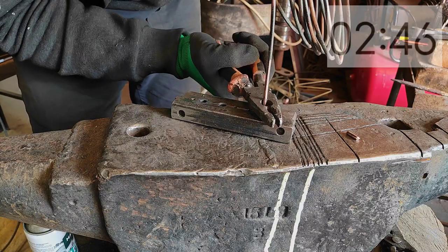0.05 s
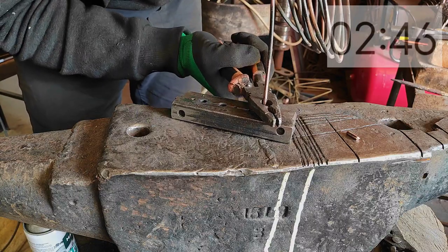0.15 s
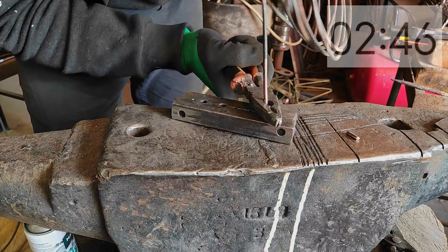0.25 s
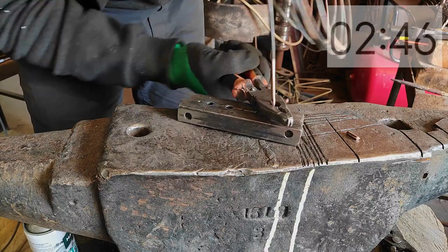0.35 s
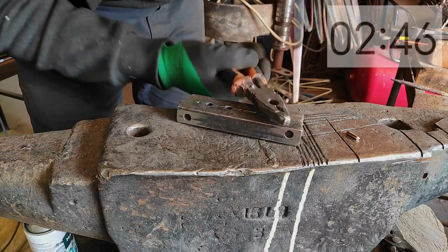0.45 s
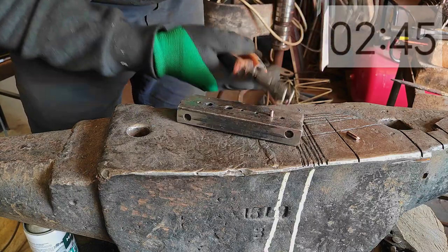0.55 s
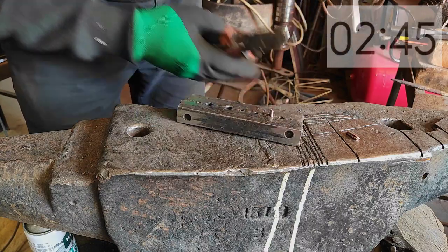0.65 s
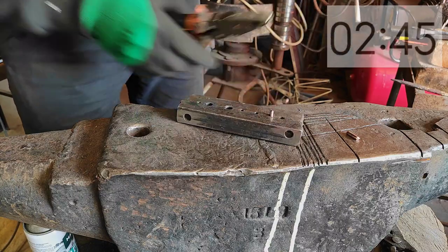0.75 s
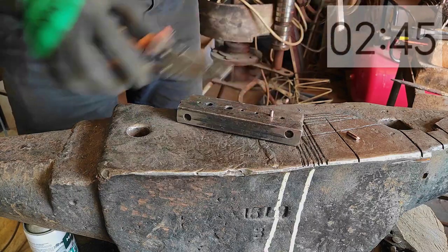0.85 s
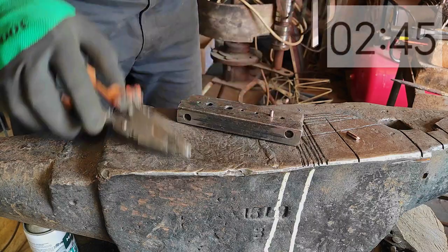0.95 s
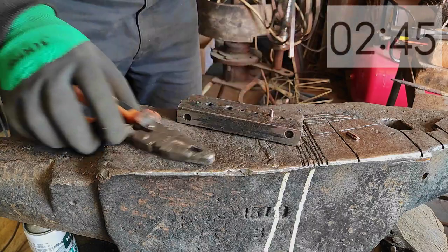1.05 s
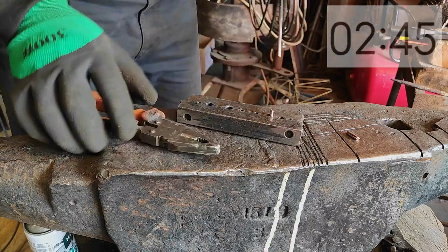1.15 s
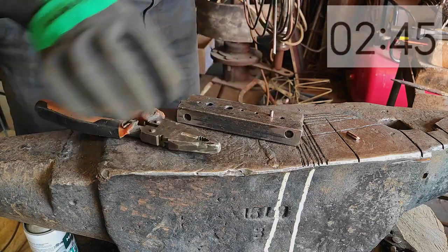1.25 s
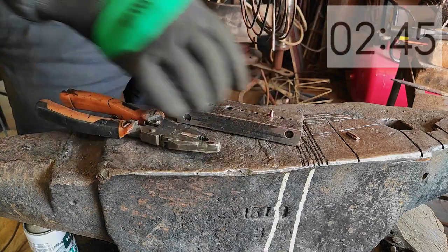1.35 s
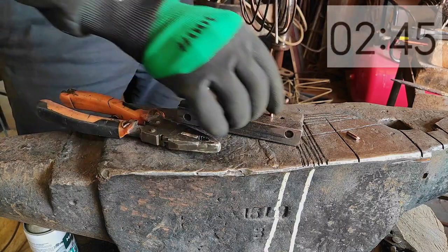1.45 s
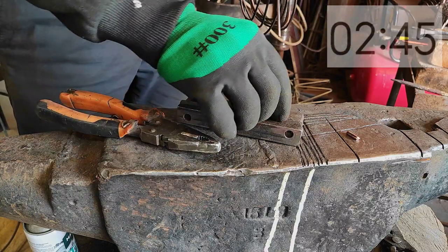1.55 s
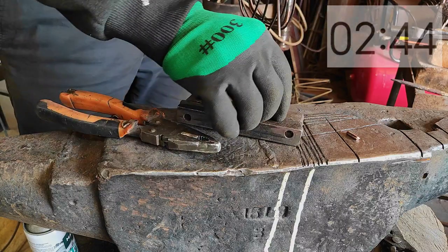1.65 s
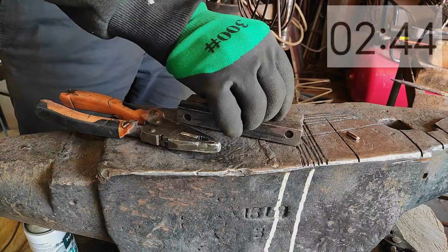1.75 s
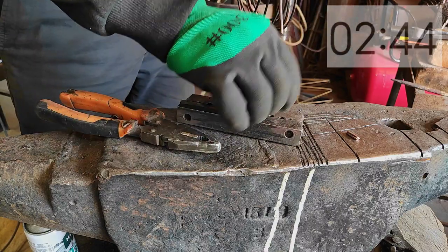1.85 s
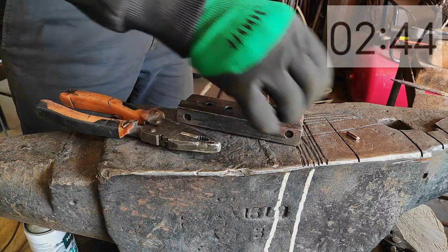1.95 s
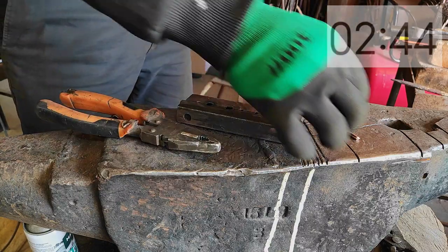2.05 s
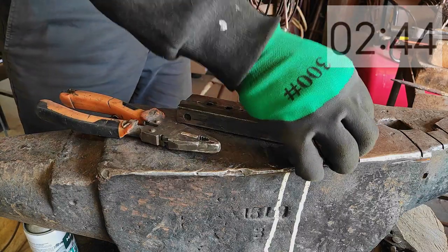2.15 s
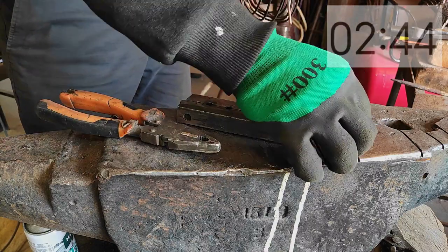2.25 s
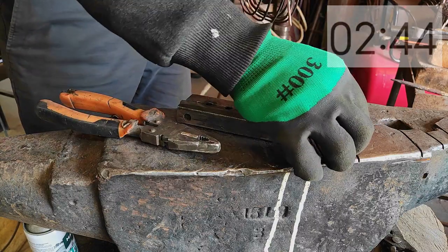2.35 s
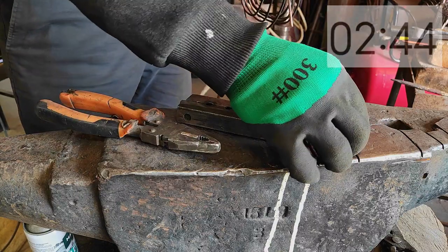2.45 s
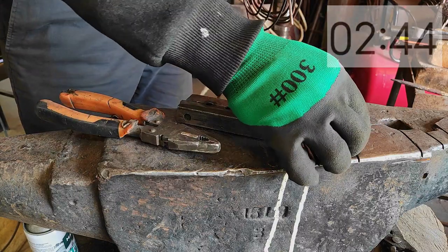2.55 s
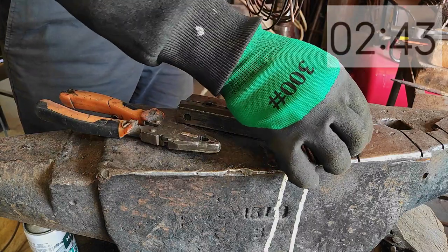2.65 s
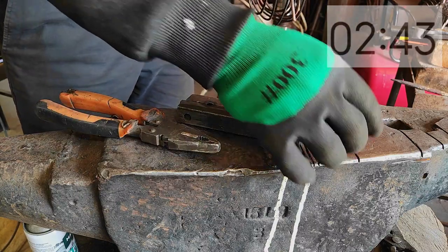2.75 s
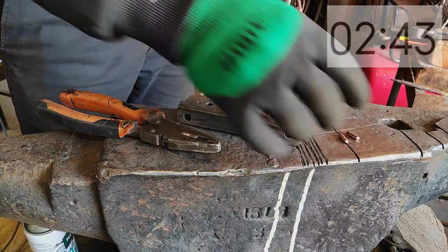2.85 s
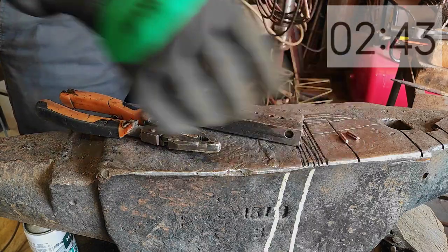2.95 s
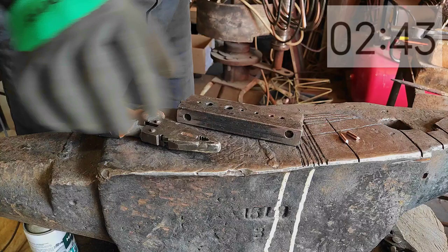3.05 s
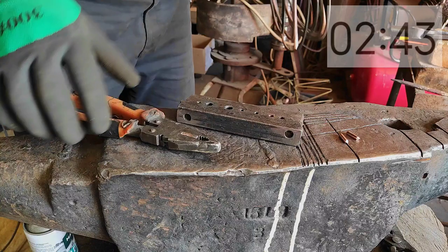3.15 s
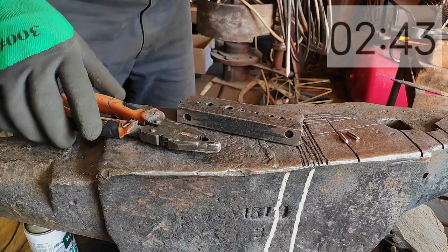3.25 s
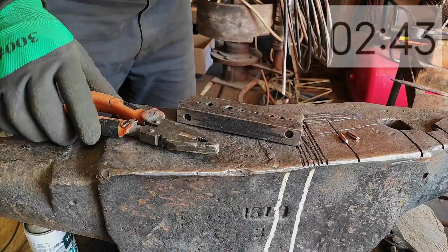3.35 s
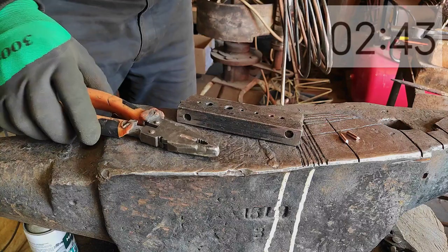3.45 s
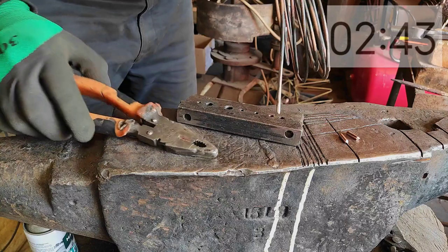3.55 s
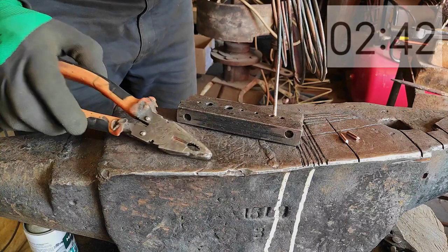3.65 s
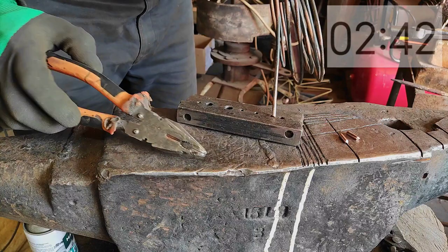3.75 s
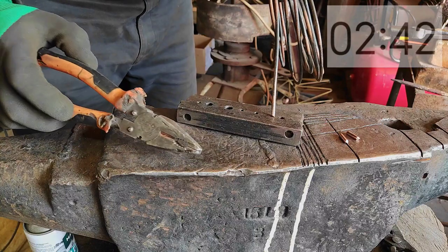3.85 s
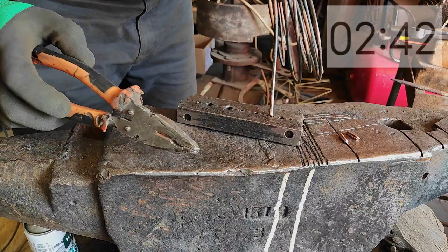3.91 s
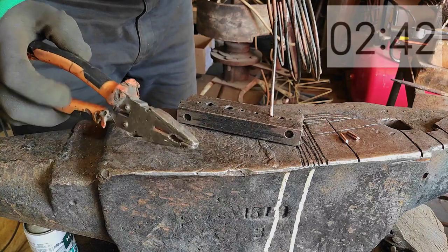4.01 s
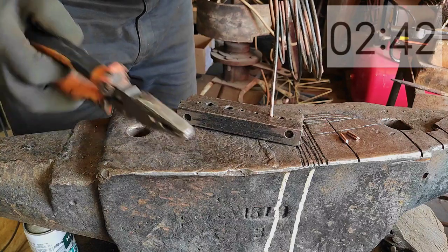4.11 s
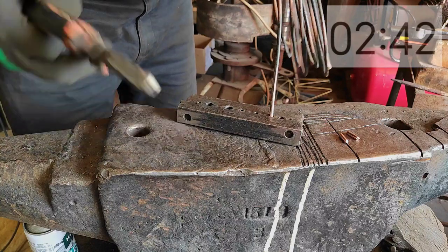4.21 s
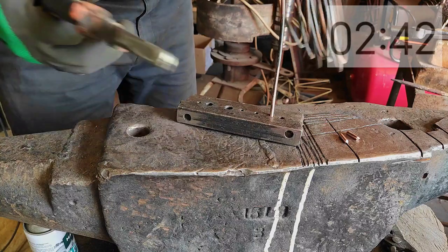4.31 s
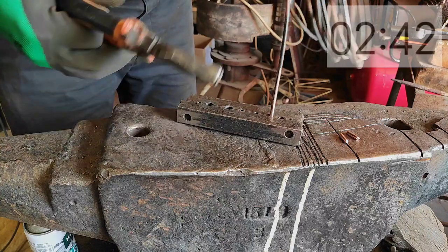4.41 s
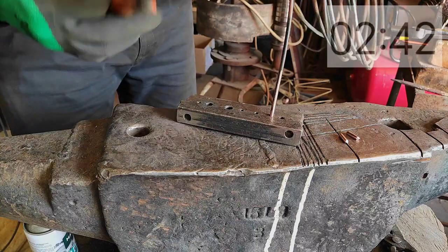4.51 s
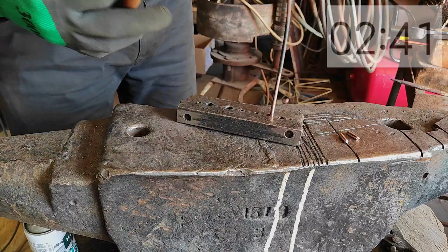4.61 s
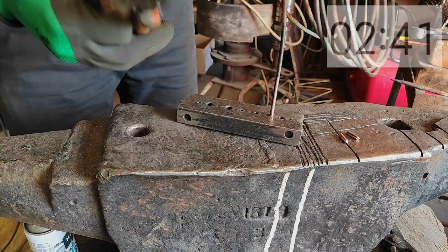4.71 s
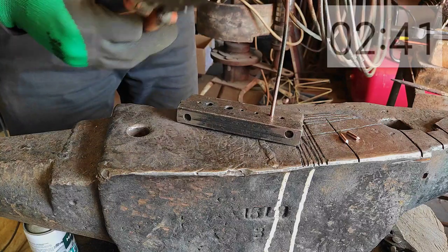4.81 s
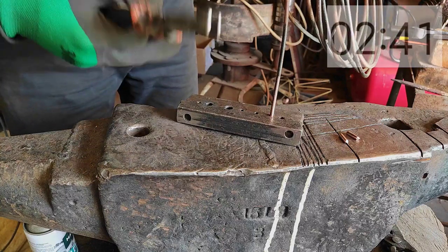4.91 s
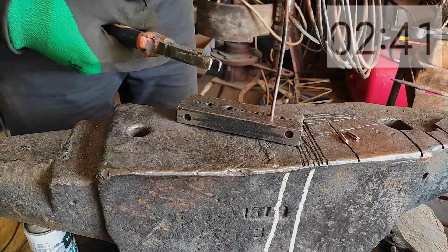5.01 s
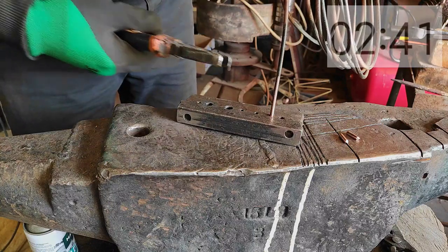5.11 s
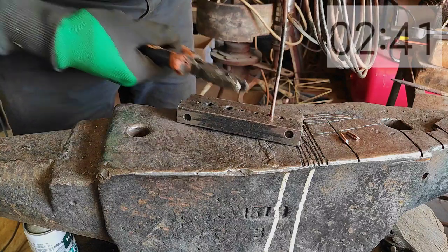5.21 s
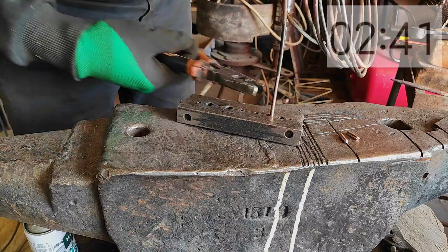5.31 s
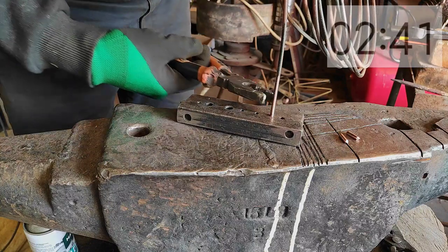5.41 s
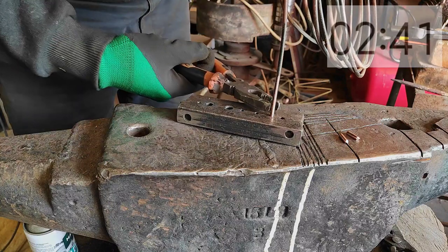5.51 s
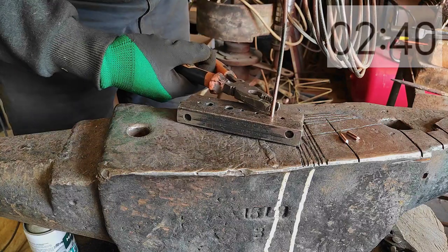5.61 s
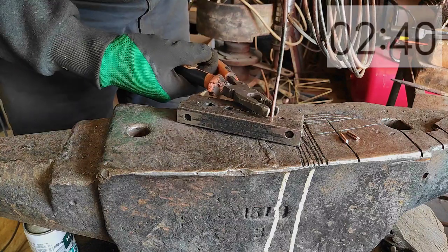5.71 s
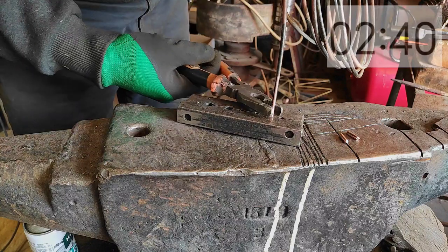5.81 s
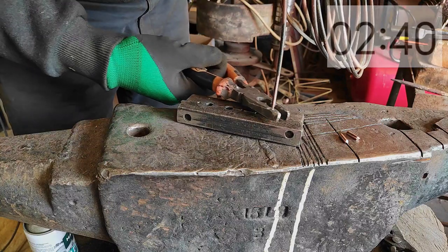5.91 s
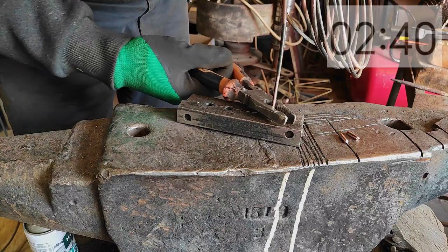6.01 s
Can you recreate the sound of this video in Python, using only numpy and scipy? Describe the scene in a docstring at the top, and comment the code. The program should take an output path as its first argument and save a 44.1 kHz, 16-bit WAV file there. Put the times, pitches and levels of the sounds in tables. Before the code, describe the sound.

Pliers snip a copper rod with a sharp crunchy snap, then clink ringing onto a steel anvil, are picked up and knocked against the rod again.

```python
"""Pliers at the anvil

Two microphones hear pliers snip a copper rod over a steel anvil, then be laid down with a clink,
picked up and set on the rod again. Each contact is a short coloured noise burst plus ringing modes;
a glove brushes the steel between them as swelling coloured noise. A small workshop answers every
blow by convolution with decaying noise, over soft room air and a low wavering hum of narrow-band noise."""
import sys
import numpy as np
from scipy import signal
from scipy.fft import rfft, irfft, next_fast_len
from scipy.io import wavfile
from scipy.ndimage import uniform_filter1d

SR = 44100
rng = np.random.default_rng(int(sys.argv[2]) if len(sys.argv) > 2 else 0)


def bounce(signal):
    """Save signal as a 16-bit WAV file at the path given by the first command-line argument."""
    frames = np.transpose(np.atleast_2d(signal))
    limited = np.clip(frames, -1, 1)
    pcm = np.round(limited * 32767).astype(np.int16)
    wavfile.write(sys.argv[1], SR, pcm)


N = 267610

# spectrum of the room's soft noise: pitch_hz, level_db
AIR_COLOUR = [(12, -32), (20, 0.5), (64, -14.5), (103, -10), (126, -12), (140, -29), (180, -18),
              (238, -28.5), (333, -25), (393, -29.5), (686, -31.5), (1100, -36), (2470, -38.5), (7520, -54),
              (15500, -49.5)]
# stereo width of that noise: pitch_hz, side_minus_mid_db
AIR_WIDTH = [(25, 1), (80, -14.5), (200, -7), (600, 0), (2000, 1), (12000, 0.5)]
# spectrum of the low hum: pitch_hz, level_db
HUM_COLOUR = [(50, -43), (75, -6), (90, 4.5), (102, -2.5), (114, 4.5), (130, -1), (160, -15), (260, -54.5)]
# the workshop's echo, band by band: pitch_hz, level_db, t60_s
ROOM_BANDS = [(120, -3.5, 1), (330, -3, 0.91), (717, -2.5, 0.56), (1544.5, -3.5, 0.58), (3535, -1.5, 0.4),
              (6500, -4.5, 0.37), (11200, -4.5, 0.28), (16000, -2, .3)]
# strokes of glove and sleeve: middle_s, length_s, level_db
BRUSHES = [(0.903, 0.65, -61), (1.857, 0.24, -65), (2.155, 0.075, -57), (3.565, 0.13, -61.5),
           (4.376, 0.17, -56), (4.729, 0.16, -56), (4.98, 0.14, -63)]
# spectrum of rubber and cloth on steel: pitch_hz, level_db
BRUSH_COLOUR = [(150, 1.5), (500, 2.5), (1200, -1), (3500, 5), (6300, 4.5), (8500, -5.5), (11000, -1.5),
                (15500, -2.5)]
# blows that reach the anvil's stand, mostly from the padded handles: start_s, level_db, ring_db
THUMPS = [(0.312, -48.5, -48), (0.405, -50.5, -70), (1.106, -46.5, -66), (1.139, -46, -54),
          (1.200, -47.5, -39), (1.232, -54.5, -73), (3.611, -57, -76), (5.621, -51, -77)]
# spectrum of a thud in the stand: pitch_hz, level_db
THUMP_COLOUR = [(60, -24), (110, -11.5), (160, 2), (230, -6.5), (320, -0.5), (500, -23.5), (1200, -31),
                (2500, -26.5), (8000, -47.5)]
# ringing of the stand: pitch_hz, level_db, t60_s
STAND_MODES = [(155, 3, .3), (268, -14, 0.51), (336, -10, .25)]
# slips of the dry pivot and cutting edges: start_s, level_db, burst_t60_s
SLIPS = [(0.474, -51, 0.058), (0.5150, -37, 0.045), (0.534, -50, 0.15), (0.720, -55.5, 0.027),
         (4.283, -56, 0.032), (5.5053, -46.5, 0.099)]
# spectrum of a slip: pitch_hz, level_db
SLIP_COLOUR = [(150, -2), (400, -8.5), (800, -7), (1500, -5.5), (3000, -0.5), (6200, 5), (8500, -0.5),
               (11000, 2.5), (15500, -2.5)]
# knocks on the steel bar under the rod: start_s, level_db
KNOCKS = [(0.876, -56.5), (5.8295, -42.5), (5.846, -50), (6.0135, -50.5), (6.039, -56.5), (6.051, -47.5)]
# spectrum of a knock: pitch_hz, level_db
KNOCK_COLOUR = [(150, -8), (400, -6), (650, -7.5), (950, 4), (1200, -3.5), (1600, -1), (2300, -11),
                (3200, -6), (5000, -6), (7000, -9.5), (9000, -18), (15500, -18.5)]
# ringing of the bar: pitch_hz, level_db, t60_s
BAR_MODES = [(775, -4, .05), (936, 4, .06), (1150, -3, .05), (1580, -1, .06), (2790, -7.5, .06),
             (6070, -9, .14)]
# knocks of the jaws against the rod: start_s, level_db
CLACKS = [(4.634, -56), (4.7095, -51.5), (4.7303, -43), (5.6194, -32.5), (5.7705, -50)]
# spectrum of such a knock: pitch_hz, level_db
CLACK_COLOUR = [(150, -8), (320, -3), (600, -15.5), (1000, -4), (1700, -3), (2700, 1), (3800, 2),
                (4700, -1), (6200, 0.5), (7500, -2.5), (8500, -14), (12000, -8.5), (15500, -24)]
# clicks of the loose jaws against each other: start_s, level_db, rebound_loss_db
TINKS = [(1.953, -59, 2), (3.6101, -25, 28), (4.8865, -49, 5), (4.933, -63, 3)]
# broad resonances of the jaws: pitch_hz, level_db
JAW_COLOUR = [(80, -28.5), (300, -15.5), (650, -22), (950, -12.5), (1500, -19.5), (3200, -9.5), (3600, 4.5),
              (4100, -13), (5100, -9), (5850, 1.5), (6600, -7.5), (7400, -21), (9500, -15.5), (15500, -35)]
# ringing of the jaws: pitch_hz, level_db, t60_s
JAW_MODES = [(3615, -12, 0.1), (4502, -7, 0.74), (5660, -11, 0.45), (5920, 5, 0.06), (6170, -2, .14),
             (7650, 1, 0.045), (12850, -10, 0.08)]
# spectrum of the pliers landing on the anvil: pitch_hz, level_db
CLINK_COLOUR = [(150, -36), (300, -17), (700, -22.5), (1150, -11), (1900, -25.5), (3000, -11), (3620, -13),
                (4100, -11.5), (4700, -7), (5400, -3.5), (6200, -5), (7400, -20), (10000, -20),
                (15500, -24)]
# ringing of the anvil: pitch_hz, level_db, t60_s
ANVIL_MODES = [(2700, -17, 0.12), (3850, -15.5, .22), (4502, 0, .7), (5055, -15.5, 1.35), (5352, -1, 0.19),
               (5640, -23, .6), (8420, -17, .3)]
# spectrum of the cut: pitch_hz, level_db
SNIP_COLOUR = [(150, -15), (350, 1), (750, -10.5), (1250, 3), (1600, 6), (1900, -4), (2700, 0), (3900, 8.5),
               (5000, 3), (7200, 3.5), (8500, -11.5), (11000, -6.5), (15500, -19)]
# ringing of the copper rod: pitch_hz, level_db, t60_s
ROD_MODES = [(373, -17, 0.5), (1503, -5, .42), (1650, -8, 0.14), (1969, -.5, .54), (2187, -2, 0.54),
             (2242, -7, 0.36), (3268, -9, .3), (3770, -9, 0.15), (3940, -14, .3), (4067, -12, .3),
             (5238, -16.5, .5), (5432, -13, .3)]

T = np.arange(N) / SR  # seconds
OPPOSITE = np.array([[1], [-1]])  # the side signal adds on the left and subtracts on the right

# a light touch is duller than a hard blow, and damps the ring less
SOFT_TILT_DB = 0.4159  # dB per octave lost for each dB below the hardest blow
RING_GROWTH = 0.38  # dB of ring gained for each dB of blow


def undb(db):
    """Decibels to gain."""
    return 10 ** (np.asarray(db) / 20)


def unit(x):
    """Scale to rms 1."""
    return x / np.sqrt(np.mean(x ** 2))


def on_log(hz, points_hz, values):
    """Join points by straight lines on a log-frequency axis."""
    return np.interp(np.log(hz + 1e-3), np.log(points_hz), values)


def colour(x, points):
    """Causal filter through (pitch_hz, level_db) points, made from the cepstrum of the log gain."""
    n = next_fast_len(x.shape[-1] + 4096, True)
    points_hz, levels_db = np.transpose(points)
    gain = undb(on_log(np.fft.rfftfreq(n, 1 / SR), points_hz, levels_db))
    cepstrum = irfft(np.log(gain), n)
    # folding the cepstrum forward puts all the response after the blow
    cepstrum[1:n // 2] *= 2
    cepstrum[n // 2 + 1:] = 0
    response = np.exp(rfft(cepstrum, n))
    return irfft(rfft(x, n) * response, n)[..., :x.shape[-1]]


def even(x, size):
    """Even out the spectrum over size neighbouring bins, keeping the finer ripple."""
    spectrum = rfft(x)
    power = uniform_filter1d(np.abs(spectrum) ** 2, size)
    return irfft(spectrum / np.sqrt(power + 1e-12))


def ports(mid, side, wide_hz):
    """Two microphones hear alike in the bass and, gradually past wide_hz, unrelated sound."""
    hz = np.fft.rfftfreq(len(mid), 1 / SR)
    width = hz / np.hypot(hz, wide_hz)
    return irfft((rfft(mid) + OPPOSITE * width * rfft(side)) / np.sqrt(1 + width ** 2))


def walk(hz):
    """Random values, hz of them a second, joined by straight lines."""
    return np.interp(T * hz, np.arange(N), rng.standard_normal(N))


def fade(t, t60):
    """Exponential decay, 60 dB in t60 seconds."""
    return np.exp(-np.log(1000) * t / max(t60, 1e-4))


def add(out, s, sound):
    """Mix a sound in at s seconds."""
    i = int(s * SR)
    out[:, i:i + sound.shape[1]] += sound[:, :N - i]


def burst(t60, size=8192, rounds=4):
    """Crowded, heavily damped modes: a short noise, evened in rounds so that it has no colour of its own."""
    shape = fade(T[:size], t60)
    noise = rng.standard_normal((2, size)) * shape
    for _ in range(rounds):
        noise = even(noise, size=1) * shape ** (1 / rounds)
    return ports(*noise, wide_hz=2055)


def uneven(x, spacing_hz=131, spread_db=4.5):
    """Each point of contact favours some of a body's crowded modes over others."""
    hz = np.arange(1, 161) * spacing_hz
    # the full spread is reached in the treble: bass modes lie too far apart to vary much
    reach_db = spread_db * hz / np.hypot(hz, 1200)
    favour = np.clip(rng.standard_normal(len(hz)), -2, 2)
    return colour(x, np.column_stack([hz, reach_db * favour]))


def ringing(modes, wide_hz=2500, size=65536):
    """A struck body's modes: decaying sine waves heard at both microphones."""
    t = T[:size]
    ring = 0
    for (hz, db, t60), lead in zip(modes, rng.choice([-1, 1], len(modes))):
        # a high mode reaches one microphone up to a quarter cycle before the other
        phase = OPPOSITE * lead * np.arctan(hz / np.hypot(hz, wide_hz))
        ring = ring + undb(db) * fade(t, t60) * np.sin(2 * np.pi * hz * t + phase)
    return ring


def blows(events, body, modes):
    """Each contact sends a burst through the body's colour and sets its modes ringing; returns cracks and rings.

    events: start_s, level_db, burst_t60_s, ring_db, pan_db (left over right), tilt_db (per octave)
    """
    cracks, rings = np.zeros((2, N)), np.zeros((2, N))
    ring = ringing(modes)
    lowest_hz = body[0][0]
    for s, db, t60, ring_db, pan_db, tilt_db in events:
        pan = undb(OPPOSITE * pan_db / 2)
        # a harder contact tilts the spectrum toward the treble
        tilted = [(hz, body_db + tilt_db * np.log2(hz / lowest_hz)) for hz, body_db in body]
        crack = colour(uneven(burst(t60)), tilted)
        # a longer contact carries more energy at the same peak
        crack *= np.sqrt(2 * t60 * SR / np.sum(crack ** 2))
        add(cracks, s, pan * undb(db) * crack)
        add(rings, s, pan * undb(ring_db) * ring)
    return np.array([cracks, rings])


def bounces(s, db, gap_s, loss_db, count):
    """A contact that repeats, weaker each time: rows of start_s, level_db."""
    return [(s + k * gap_s, db - k * loss_db) for k in range(count)]


def contacts(hits, ring_db, tilt_db, pan_db, t60=None):
    """Ring and brightness follow each hit's strength; ring_db and tilt_db are those of the hardest hit."""
    hardest_db = max(hit[1] for hit in hits)
    events = []
    for s, db, *own_t60 in hits:
        burst_t60 = own_t60[0] if own_t60 else t60
        below_db = db - hardest_db
        hit_ring_db = ring_db + RING_GROWTH * below_db
        hit_tilt_db = tilt_db + SOFT_TILT_DB * below_db
        events.append((s, db, burst_t60, hit_ring_db, pan_db, hit_tilt_db))
    return events


def background(air_db=-52.5, hum_db=-60.5, hum_start_db=7.5, hum_settle_s=1.0, hum_side_db=-14):
    """A narrow, wavering hum over soft room noise that widens toward the treble."""
    mid, side, hum_mid, hum_side = rng.standard_normal((4, N))
    air = unit(colour(mid + OPPOSITE * colour(side, AIR_WIDTH), AIR_COLOUR))
    hum = unit(colour(hum_mid + OPPOSITE * undb(hum_side_db) * hum_side, HUM_COLOUR))
    # the hum starts a little louder and settles
    hum_gain = undb(hum_db + hum_start_db * np.exp(-T / hum_settle_s))
    return undb(air_db) * air + hum_gain * hum


def workshop(x, early_db=5, early_t60=0.11, first_s=0.0018, size=49152):
    """Dense early echoes from nearby clutter, then a longer tail that mostly dies sooner in the treble."""
    t, hz = T[:size], np.fft.rfftfreq(size, 1 / SR)
    noise = rng.standard_normal((2, size))
    points_hz, levels_db, t60s = np.transpose(ROOM_BANDS)
    # the echoes swell in around first_s
    onset = np.clip(t / first_s - 1 / 2, 0, 1)
    response = 0
    for share, db, t60 in zip(np.eye(len(ROOM_BANDS)), levels_db, t60s):
        shape = (fade(t, t60) + undb(early_db) * fade(t, early_t60)) * onset
        band = on_log(hz, points_hz, share)  # overlaps its neighbours
        response = response + undb(db) * band * rfft(even(noise * shape, size=101))
    echoes = ports(*irfft(response), wide_hz=800)[:, :size * 7 // 8]
    return signal.fftconvolve(x.mean(axis=0, keepdims=True), echoes, axes=1)[:, :N]


def glove(rustle_db=-70.5, rustle_swing_db=1, rustle_hz=8.1, grain_db=3, grain_hz=250):
    """Rubber and cloth slide in short swells over a faint rustle, catching unevenly."""
    strokes = sum(undb(db) * np.exp(-2 * ((T - s) / length) ** 2) for s, length, db in BRUSHES)
    rustle = undb(rustle_db + rustle_swing_db * walk(rustle_hz))
    swell = np.hypot(strokes, rustle)
    grain = undb(grain_db * walk(grain_hz))
    return swell * unit(colour(rng.standard_normal((2, N)) * grain, BRUSH_COLOUR))


def stand(t60=0.089, pan_db=-2, tilt_db=2.04):
    """Dull thuds travel through the anvil into its stand."""
    events = [(s, db, t60, ring_db, pan_db, tilt_db) for s, db, ring_db in THUMPS]
    return blows(events, THUMP_COLOUR, STAND_MODES)


def slipping_pivot():
    """The dry pivot and cutting edges slip, each slip a noise burst of its own length."""
    slips = contacts(SLIPS, ring_db=-62.5, tilt_db=3.1, pan_db=-1.5)
    return blows(slips, SLIP_COLOUR, JAW_MODES)


def bar_knocks():
    """Knocks on the steel bar under the rod excite its short ringing."""
    knocks = contacts(KNOCKS, ring_db=-51, tilt_db=1.23, pan_db=-.5, t60=0.023)
    return blows(knocks, KNOCK_COLOUR, BAR_MODES)


def rod_clacks():
    """The jaws knock against the rod and set it ringing faintly."""
    clacks = contacts(CLACKS, ring_db=-64, tilt_db=2.97, pan_db=-6, t60=0.014)
    return blows(clacks, CLACK_COLOUR, ROD_MODES)


def loose_jaws(rebound_gap_s=0.013):
    """The jaws click together and rebound once, weaker."""
    clicks = []
    for s, db, loss_db in TINKS:
        clicks += bounces(s, db, rebound_gap_s, loss_db, count=2)
    events = contacts(clicks, ring_db=-46.5, tilt_db=0.7, pan_db=-0.4, t60=.008)
    return blows(events, JAW_COLOUR, JAW_MODES)


def lay_down(land_s=1.1052):
    """The pliers strike the anvil once, hard, skid a little, then rock on it, weaker each time."""
    landing = contacts([(land_s, -19)], ring_db=-31, tilt_db=0, pan_db=-2.5, t60=0.0064)
    skid = contacts([(land_s + .0118, -36)], ring_db=-63.5, tilt_db=-4.5, pan_db=3.0, t60=0.024)
    sway = bounces(land_s + .035, -38, gap_s=.046, loss_db=9, count=3)
    rocks = contacts(sway, ring_db=-55.5, tilt_db=-0.5, pan_db=7, t60=.03)
    return blows(landing + skid + rocks, CLINK_COLOUR, ANVIL_MODES)


def cut(snap_s=0.3088, spring_s=0.3915, recoil_lag_s=.0049):
    """The rod snaps, the jaws recoil in a quick crunch, and the freed rod springs back ringing."""
    snap = contacts([(snap_s, -17.5)], ring_db=-41.5, tilt_db=-3, pan_db=-.5, t60=0.0064)
    crunch = bounces(snap_s + recoil_lag_s, -26.5, gap_s=recoil_lag_s, loss_db=5, count=3)
    recoil = contacts(crunch, ring_db=-57.5, tilt_db=9, pan_db=0, t60=0.017)
    spring = contacts([(spring_s, -45)], ring_db=-42, tilt_db=2.5, pan_db=-1.4, t60=.1)
    return blows(snap + recoil + spring, SNIP_COLOUR, ROD_MODES)


def scene(face_echo_db=-2, above_echo_db=3, ring_echo_db=-4):
    """All the handling at the anvil, its echo, the glove, the room air and the hum."""
    # the anvil face mirrors sounds made on it straight at the microphones, so these stand out from the room
    on_face, face_rings = lay_down() + loose_jaws()
    above, above_rings = cut() + rod_clacks() + bar_knocks() + slipping_pivot() + stand()
    rings = face_rings + above_rings
    to_room = undb(face_echo_db) * on_face + undb(above_echo_db) * above + undb(ring_echo_db) * rings
    return on_face + above + rings + workshop(to_room) + glove() + background()


def record(dry, top_hz=15700):
    """The recorder cuts the treble steeply above top_hz."""
    low_pass = signal.ellip(8, .2, 70, top_hz, fs=SR, output="sos")
    return signal.sosfilt(low_pass, dry)


dry = scene()
out = record(dry)
bounce(out)
```